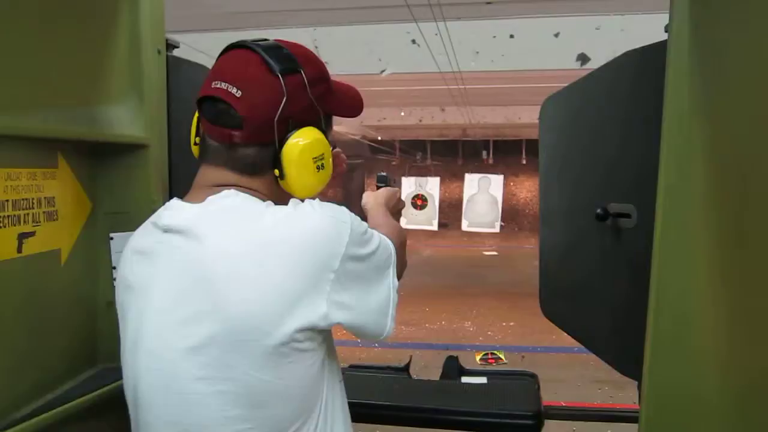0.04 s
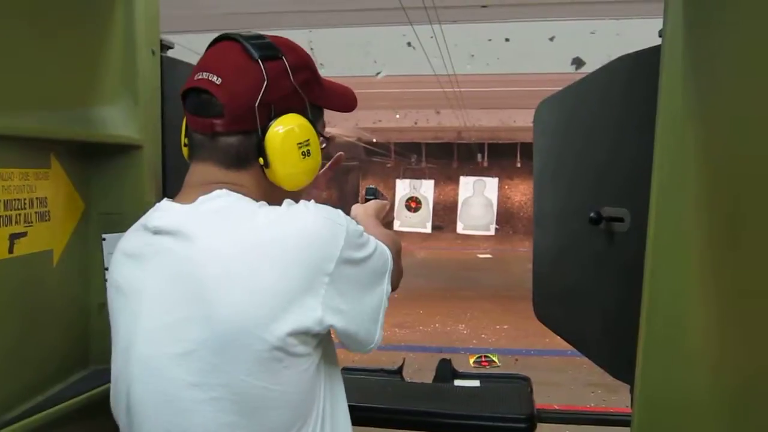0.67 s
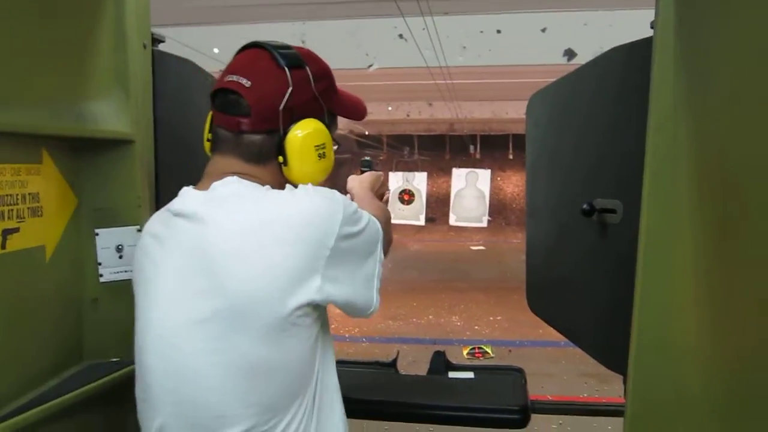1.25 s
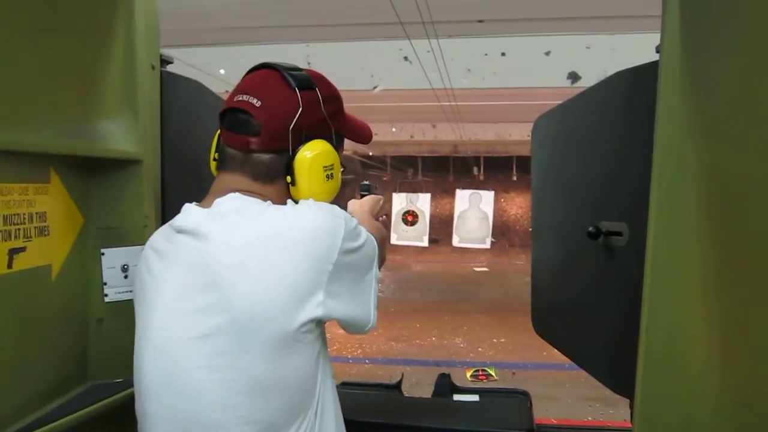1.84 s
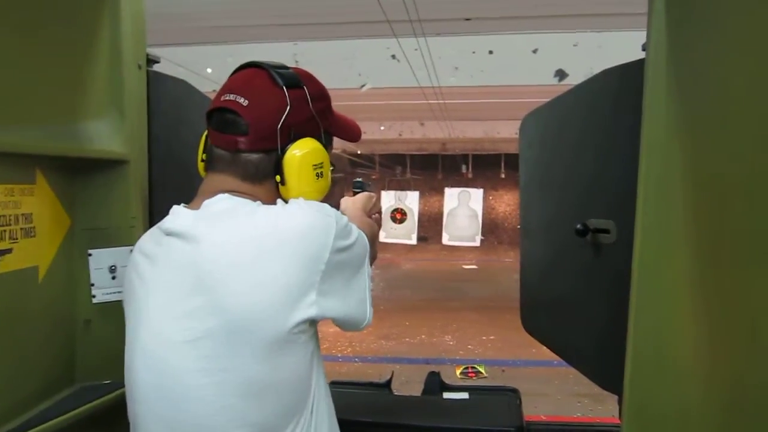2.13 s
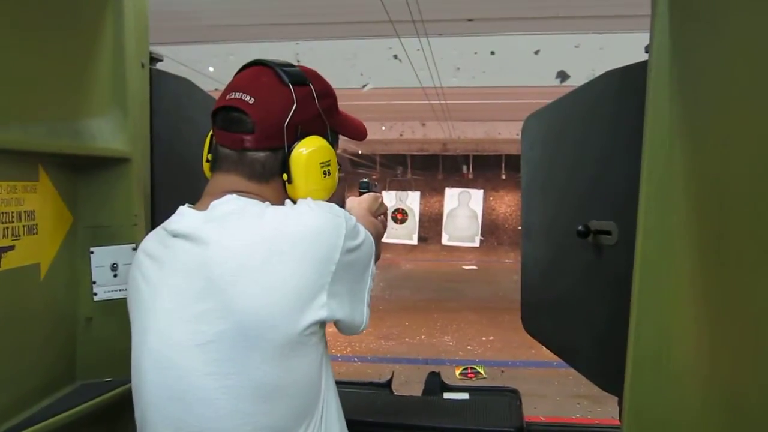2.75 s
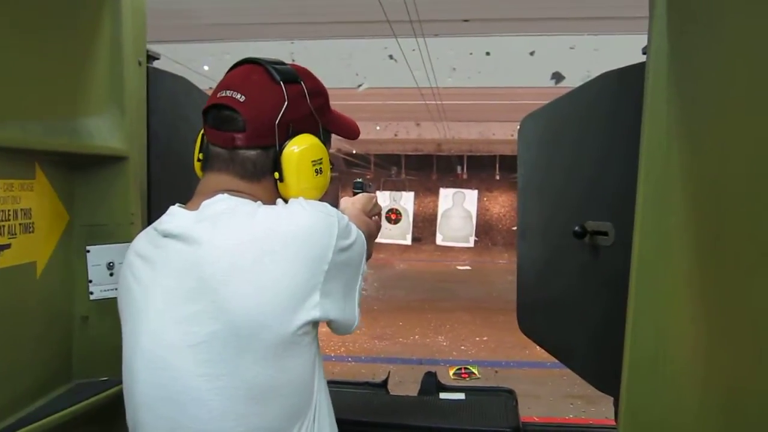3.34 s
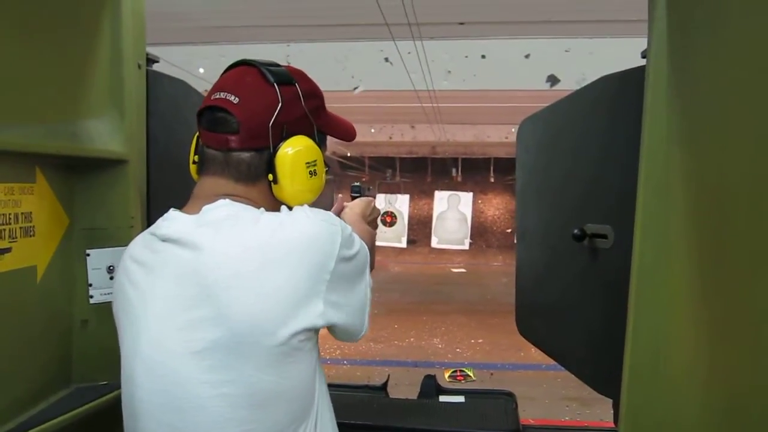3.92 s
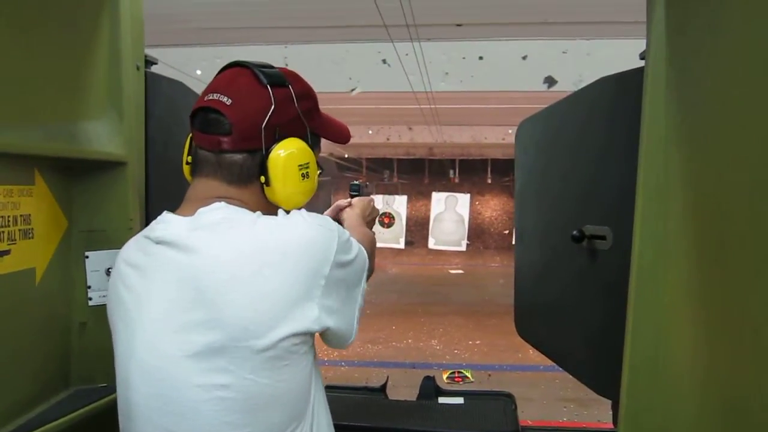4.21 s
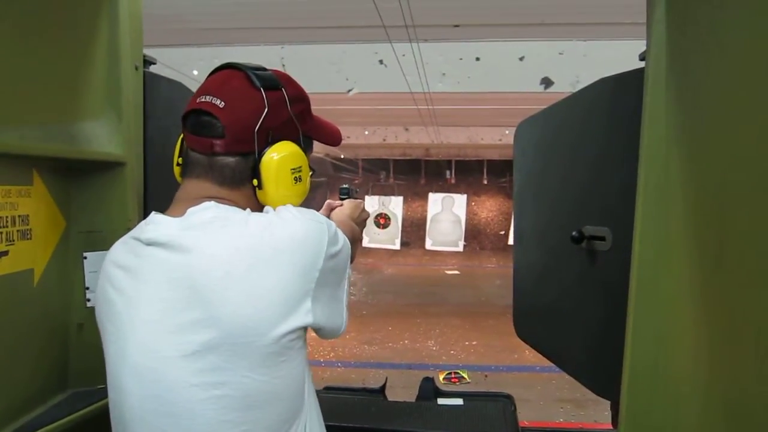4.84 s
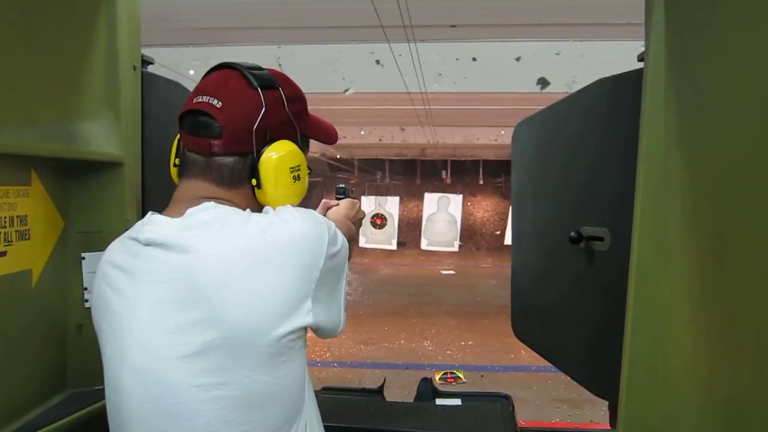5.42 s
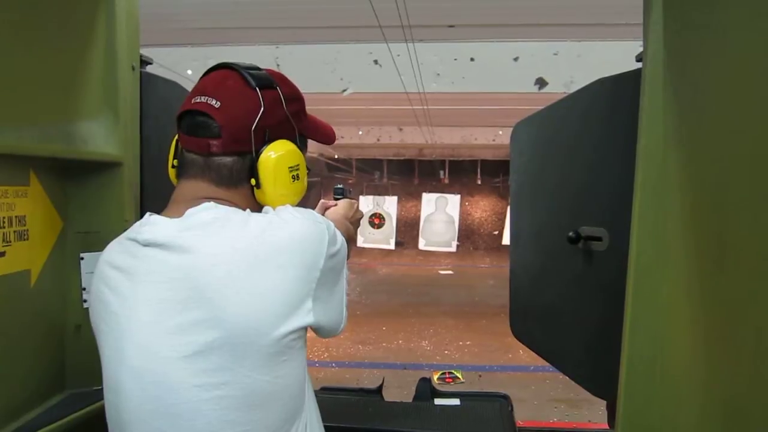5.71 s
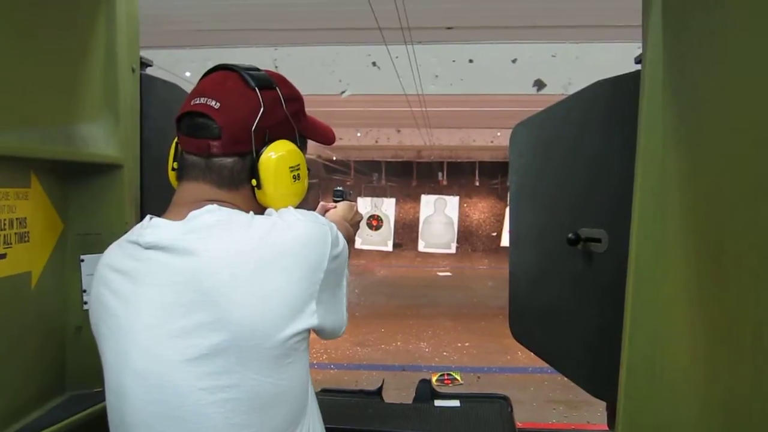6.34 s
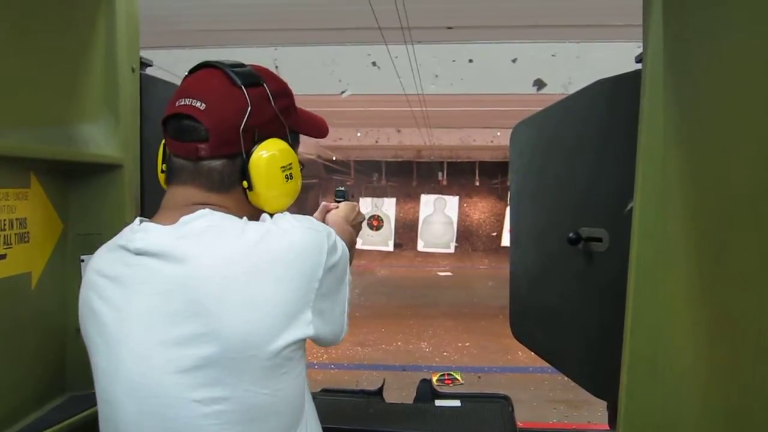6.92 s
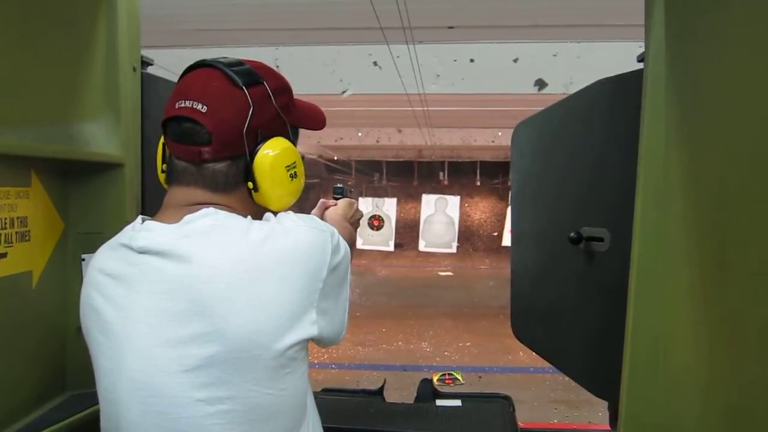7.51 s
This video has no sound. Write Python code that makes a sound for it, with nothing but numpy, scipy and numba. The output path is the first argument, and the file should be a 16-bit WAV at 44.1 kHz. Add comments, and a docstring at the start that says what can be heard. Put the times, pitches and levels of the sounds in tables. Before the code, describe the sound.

Eight quick gunshots from a nearby lane, then two heavy handgun shots, echo through an indoor range as brass casings tinkle.

```python
"""An indoor pistol range: eight quick, bright shots from a nearby lane, then two heavy ones from this booth.
Each blast excites the concrete hall, whose reverberation lasts for seconds. Brass cases ring in their
modes as they land; gear clicks, something distant clacks and feet shuffle over the noise of the fans.
The shots saturate the microphones and the gain control ducks; the fans swell back as it recovers."""
import sys
import numpy as np
from scipy import signal
from scipy.fft import rfft, irfft, next_fast_len
from scipy.io import wavfile
from numba import njit

SR = 44100
rng = np.random.default_rng(int(sys.argv[2]) if len(sys.argv) > 2 else 0)


def unload_wav(signal):
    """Save mono or channel-first audio to the path in sys.argv[1] as 16-bit WAV at rate SR, clipped to [-1, 1]."""
    wavfile.write(
        sys.argv[1],
        SR,
        np.round(np.clip(np.atleast_2d(signal).T, -1, 1) * 32767).astype(np.int16),
    )


N = 333837

# Resonances of hall and booth. Each row: frequency in Hz, width in Hz, gain in dB.
HALL_MODES = [(146, 28, 4), (169.4, 12, 4.5), (220, 3.9, -1), (261.5, 7.2, 1.5), (327, 5.6, 6),
              (432, 18, 1.5), (626, 15, 3.5), (790, 12, 0.5), (4030, 70, 2), (4400, 80, 0),
              (5090, 60, -3.5)]
# Reverberation time. Each row: frequency in Hz, time to fall 60 dB (t60) in seconds.
HALL_T60 = [(60, 2.3), (250, 3.7), (600, 4.2), (1400, 3.23), (2800, 2.88), (5000, 2.21), (10000, 1.16),
            (16000, 0.87)]
# Quick shots. Each row: start in seconds, then levels of shot, bright surge and low thump in dB.
LANE_SHOTS = [(0.0719, -5, -25, -25), (0.19, 0.5, 0, -6), (0.425, 1, -5, 6.5), (.745, 0, -2, 6),
              (0.9969, 1, 1.5, -1), (1.2194, 1.5, 1.5, -9), (1.4484, 0, -2.5, 5), (1.6726, 1, -5, -11)]
# Spectra of the two guns, fans and shoes. Each row: frequency in Hz, relative spectral density in dB.
LANE_SPECTRUM = [(30, -36.5), (90, -21.5), (170, -11.5), (350, -6.5), (650, -2.5), (1100, -1), (2000, 0),
                 (3300, 1.5), (5000, -1.5), (7000, -7.5), (11000, -9.5), (16000, -28)]
BOOTH_SPECTRUM = [(30, -12.5), (90, -21.5), (170, -10.5), (350, -2.5), (620, -2), (900, -3), (1200, -5),
                  (2000, -12), (3300, -13), (5000, -16.5), (7000, -20), (11000, -22), (16000, -29.5)]
FAN_SPECTRUM = [(25, -3.5), (70, 3), (140, 0), (300, 1.8), (620, -1.5), (1000, -4), (2000, -10.5),
                (4000, -23), (7000, -30), (11000, -34.5), (16000, -53)]
SCUFF_SPECTRUM = [(160, -25), (520, -2), (1050, 2.5), (1700, -9), (3100, -21), (6300, -28), (14700, -42)]
# Brass landing. Each row: start in seconds, levels of tick, ring and skitter in dB,
# main ring frequency in Hz, its t60 in seconds.
CASE_LANDINGS = [(2.435, -48, -52, -55, 11930, .9), (3.635, -58, -61, -53, 11480, 2.1),
                 (3.905, -54, -66, -68, 12050, 1.1), (4.017, -36, -53, -58, 10900, 0.27),
                 (7.399, -28, -30.5, -60, 10960, 0.34)]
# Modes of a case. Each row: ratio to the main ring frequency, relative level in dB.
CASE_MODES = [(.573, -16), (.64, -15), (.775, -18.5), (.993, 2), (1.001, -2.5), (1.014, -13.5)]
# Heavy shots. Each row: start in seconds, levels of shot and hammer in dB,
# gains of the bass and of the body near 900 Hz in dB.
BOOTH_SHOTS = [(2.6407, 1.5, -29.5, 1.5, -.5), (6.526, 1.5, -8, -2, 1.5)]
# Booth modes, a beating pair and three lower. Each row: frequency in Hz, relative dB, t60 in seconds.
BOOTH_MODES = [(629, -21.5, 6.5), (635, -23.5, 6.4), (215.4, -27, 4.7), (260, -27, 7), (327, -27.5, 5.8)]
# Handled gear. Each row: start in seconds, level in dB, centre in Hz, width in Hz.
GEAR_CLICKS = [(4.6365, -55, 12000, 4000), (4.7088, -42.5, 7660, 6000), (4.735, -51, 7000, 4000),
               (4.85, -53, 9000, 6000), (4.9567, -48, 6400, 1200)]
# Shuffling feet. Each row: midpoint in seconds, length in seconds, level in dB.
SCUFFS = [(5.274, .11, -34.5), (5.975, .15, -38.5), (6.09, .16, -38.5)]
# Bands of a distant clack. Each row: centre in Hz, width in Hz, level in dB, t60 in seconds.
CLACK_BANDS = [(145, 61, -33, 0.42), (650, 600, -30.5, .3), (2600, 2500, -36.5, 0.58),
               (11000, 5000, -53, 0.36)]


def undb(db):
    """Amplitude ratio: tenfold for every 20 dB."""
    return 10 ** (np.asarray(db) / 20)


def along(table, hz):
    """Interpolation of (Hz, value) points on a log-frequency axis."""
    f, value = np.transpose(table)
    return np.interp(np.log(np.maximum(hz, 1)), np.log(f), value)


def fade(t, t60):
    """Exponential decay, 60 dB down after t60."""
    return np.exp(-np.log(1000) * t / t60)


def add(out, s, sound):
    """Superposition: a sound joins the mix at s seconds."""
    start = max(int(s * SR), 0)
    part = sound[..., :max(N - start, 0)]
    out[:, start:start + part.shape[-1]] += part


def wander(size, rate):
    """Random modulation: glides between Gaussian values, rate of them a second."""
    knots = rng.standard_normal(256)
    return np.interp(np.arange(size) / SR * rate, np.arange(len(knots)), knots)


def diffuse(colour, size, port_gap_m=0.048, sound_speed=343, bass_spread=0.12, bass_spread_hz=140):
    """Diffuse-field spectrum: long waves reach both microphone ports coherently, short ones do not."""
    hz = np.arange(size // 2 + 1) * SR / size
    lift = sum((undb(db) - 1) / (1 + (2 * (hz - f) / width) ** 2) for f, width, db in HALL_MODES)
    gain = undb(along(colour, hz)) * (1 + lift)
    coherence = np.sinc(2 * hz * port_gap_m / sound_speed)
    # the deep bass differs a little between left and right
    coherence *= 1 - bass_spread / (1 + (hz / bass_spread_hz) ** 2)
    mid, side = rfft(rng.standard_normal((2, size))) * np.sqrt([(1 + coherence) / 2, (1 - coherence) / 2])
    return hz, np.array([mid + side, mid - side]) * gain / np.sqrt(np.mean(gain ** 2))


def hall(colour, early_db, early_t60, late_db, build_s, bass_lag, echo_db, echo_s, echo_width_s, size):
    """Reverberation: early reflections, a smeared far-end echo, a late field that loses treble first."""
    hz, spectrum = diffuse(colour, size)
    t = np.arange(size) / SR
    early = undb(early_db) * fade(t, early_t60)
    echo = undb(echo_db) * np.exp(-((t - echo_s) / echo_width_s) ** 2)
    out, centres = 0, np.geomspace(60, 16000, 13)
    for centre, pick in zip(centres, np.eye(len(centres))):
        band = irfft(spectrum * np.interp(hz, centres, pick))
        roll = undb(0.74 * wander(size, rate=8.65))  # the sound rolls to and fro
        build = 1 - np.exp(-t / (build_s * (centres[-1] / centre) ** bass_lag))  # lows build more slowly
        late = (undb(late_db) + echo) * fade(t, along(HALL_T60, centre))
        out = out + band * roll * build * (early + late)
    return out


def burst(hz, width_hz, t60, size=16384):
    """Band-limited decay: noise fades after two like resonators in cascade, each width_hz wide."""
    top_hz = .45 * SR
    b, a = signal.iirpeak(min(hz, top_hz), hz / min(width_hz, top_hz), fs=SR)
    noise = signal.lfilter(b, a, signal.lfilter(b, a, rng.standard_normal((2, size))))
    return noise / noise.std() * fade(np.arange(size) / SR, t60)


def thump(length_s, size=4096):
    """Pressure pulse: a one-sided push of air with a slow rebound."""
    t = np.arange(size) / SR / length_s
    return -(1 - np.exp(-4 * t)) * (1 - t / 2) * np.exp(-t)


def lane_gun(surge_s=0.049, thump_delay_s=.05):
    """Impulse and reflection: a gun cracks behind the partition, a bright surge follows, and the backstop
    returns a smeared echo."""
    out = np.zeros((2, N))
    for s, db, surge_db, thump_db in LANE_SHOTS:
        reverb = hall(LANE_SPECTRUM, early_db=0, early_t60=1.0, late_db=-9.0, build_s=0.0044,
                      bass_lag=.1, echo_db=-10.5, echo_s=0.17, echo_width_s=0.067, size=114688)
        surge = burst(hz=3660, width_hz=2300, t60=0.78)
        age = np.arange(surge.shape[1]) / SR / surge_s
        add(out, s, undb(db) * reverb)
        add(out, s, undb(surge_db) * surge * age * np.exp(1 - age))
        add(out, s, undb(db + 1.5) * burst(hz=3500, width_hz=10500, t60=0.0093))  # crack
        add(out, s, undb(db - 14.5) * burst(hz=11300, width_hz=6500, t60=1.0))  # sizzling tail
        add(out, s + thump_delay_s, undb(thump_db) * thump(length_s=.003))
    return out


def rush(colour, size):
    """Stationary noise: a diffuse field of one spectral shape."""
    return irfft(diffuse(colour, size)[1])


def fans(level_db=-39, waver_db=1.4):
    """Broadband flow noise: the extractor fans rush evenly, wavering a little."""
    air = rush(FAN_SPECTRUM, size=2 * next_fast_len(N // 2 + 1))[:, :N]
    return air * undb(level_db + waver_db * wander(N, rate=8))


def ring(modes, size, channels=2, waver_db=5.5):
    """Damped free vibration in (Hz, dB, t60) modes; the hall's reflections make each one waver."""
    t = np.arange(size) / SR
    out = 0
    for hz, db, t60 in modes:
        envelope = undb(db + waver_db * wander(size, rate=12)) * fade(t, t60)
        out = out + envelope * np.sin(2 * np.pi * (hz * t + rng.random((channels, 1))))
    return out


def brass_cases(jingle_db=3.0):
    """Impact excites inharmonic modes: each case ticks on the concrete, rings and skitters away."""
    out = np.zeros((2, N))
    for s, tick_db, ring_db, skitter_db, hz, t60 in CASE_LANDINGS:
        modes = [(ratio * hz, db, t60) for ratio, db in CASE_MODES]
        add(out, s, undb(tick_db) * burst(hz=10000, width_hz=9000, t60=0.067))
        add(out, s, undb(ring_db) * ring(modes, size=SR, waver_db=3.5))
        jingle = undb(skitter_db + jingle_db * wander(SR, rate=40))
        add(out, s, jingle * burst(hz=11500, width_hz=6000, t60=1.3, size=SR))
    return out


def shock(length_s, size=1024):
    """Blast wave: a jump of pressure that sinks into a shallow rarefaction after length_s."""
    t = np.arange(size) / SR / length_s
    return (1 - t) * np.exp(-t)


def booth_gun(hammer_lead_s=0.0024):
    """Direct sound, then reverberation: the hammer snaps, the blast rattles the booth and fills the hall."""
    out = np.zeros((2, N))
    for s, db, hammer_db, bass_db, body_db in BOOTH_SHOTS:
        colour = []
        for hz, level in BOOTH_SPECTRUM:
            bass = bass_db / (1 + (hz / 500) ** 2)
            body = body_db * np.exp(-2 * np.log2(hz / 900) ** 2)
            colour.append((hz, level + bass + body))
        roar = hall(colour, early_db=0.5, early_t60=0.86, late_db=1.5, build_s=0.0067,
                    bass_lag=0.51, echo_db=0.5, echo_s=0.34, echo_width_s=0.25, size=196608)
        add(out, s - hammer_lead_s, undb(hammer_db) * burst(hz=4000, width_hz=7300, t60=0.032))
        add(out, s, undb(db + 15.0) * shock(length_s=0.00069))
        add(out, s, undb(db + 14.5) * burst(hz=2260, width_hz=3100, t60=0.0067))  # crack
        add(out, s, undb(db + 3) * burst(hz=12000, width_hz=5500, t60=0.062))  # sizzle
        add(out, s, undb(db + 3) * burst(hz=3010, width_hz=6000, t60=0.36))  # rattle
        add(out, s, undb(db) * roar)
        add(out, s, undb(db) * ring(BOOTH_MODES, size=220000, channels=1))
    return out


def gear_clicks():
    """Heavily damped transients: handled gear gives small, bright clicks."""
    out = np.zeros((2, N))
    for s, db, hz, width_hz in GEAR_CLICKS:
        add(out, s, undb(db) * burst(hz, width_hz, t60=.07))
    return out


def foot_scuffs():
    """Sliding friction: noise swells and fades as feet shuffle on the floor."""
    out = np.zeros((2, N))
    for s, length_s, db in SCUFFS:
        size = int(length_s * SR)
        friction = rush(SCUFF_SPECTRUM, size=32768)[:, :size]
        add(out, s - length_s / 2, undb(db) * friction * np.hanning(size))
    return out


def distant_clack(start_s=5.52):
    """Transient decay in broad bands: a distant clack with a low thud."""
    out = np.zeros((2, N))
    for hz, width_hz, db, t60 in CLACK_BANDS:
        knock = burst(hz, width_hz, t60)
        add(out, start_s, undb(db) * (knock if hz > 1500 else knock[0]))  # lows reach both ports alike
    return out


def scene():
    """Superposition of all sources; there is silence until the first shot."""
    begun = np.arange(N) >= int(LANE_SHOTS[0][0] * SR)
    shooting = lane_gun() + booth_gun() + brass_cases()
    return begun * (shooting + gear_clicks() + distant_clack() + foot_scuffs() + fans())


@njit
def follow(level, attack, release):
    """Envelope detection: a one-pole smoother that rises fast and sinks slowly."""
    out, envelope = np.empty(len(level)), 0.
    for i in range(len(level)):
        envelope += (level[i] - envelope) * (attack if level[i] > envelope else release)
        out[i] = envelope
    return out


def record(dry, balance_db=0.42, bias=0.13, limit_db=-15, makeup_db=7.5, ceiling=0.76,
           attack_s=0.00074, react_s=0.00074, release_s=1.61,
           presence_hz=3900, presence_width_hz=2200, presence_db=1.0, notch_hz=8195, notch_width_hz=1510):
    """Asymmetric saturation in the microphones, then automatic gain control, clipping and filtering."""
    sound = np.tanh(dry * undb([[balance_db], [-balance_db]]) + bias) - np.tanh(bias)
    envelope = follow(np.abs(sound).max(axis=0), 1 / (attack_s * SR), 1 / (release_s * SR))
    # the control reacts late, so the first crack clips before the gain ducks
    delayed = np.interp(np.arange(N) - react_s * SR, np.arange(N), envelope)
    reduction = np.maximum(delayed / undb(limit_db), 1)
    sound = np.clip(sound * undb(makeup_db) / reduction, -ceiling, ceiling)
    b, a = signal.iirpeak(presence_hz, presence_hz / presence_width_hz, fs=SR)
    sound = sound + (undb(presence_db) - 1) * signal.lfilter(b, a, sound)
    b, a = signal.iirnotch(notch_hz, notch_hz / notch_width_hz, fs=SR)
    sound = signal.lfilter(b, a, signal.lfilter(b, a, sound))
    sound = signal.sosfilt(signal.butter(2, [28, 14800], "band", fs=SR, output="sos"), sound)
    return signal.sosfilt(signal.ellip(12, .2, 80, 15950, fs=SR, output="sos"), sound)  # steep low-pass


dry = scene()
out = record(dry)
unload_wav(out)
```